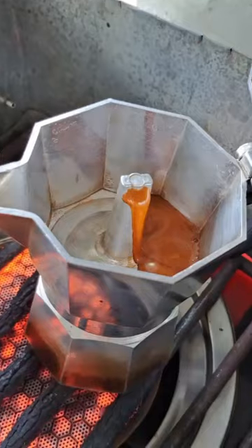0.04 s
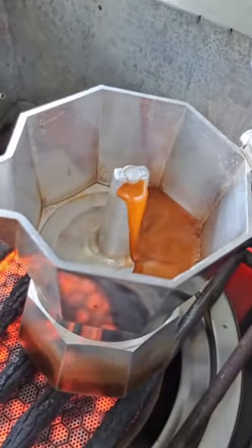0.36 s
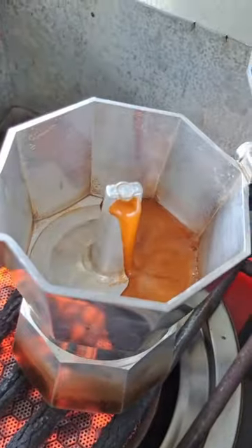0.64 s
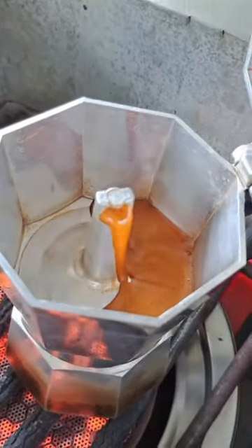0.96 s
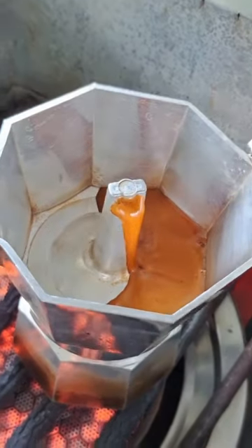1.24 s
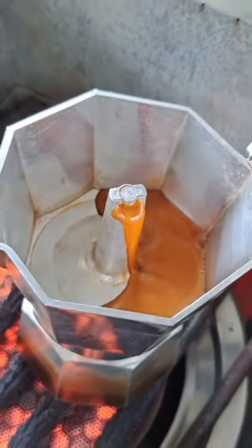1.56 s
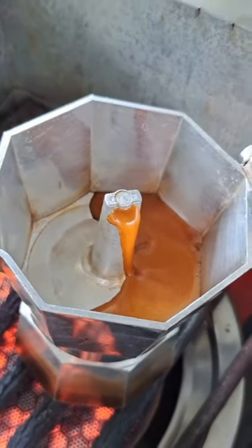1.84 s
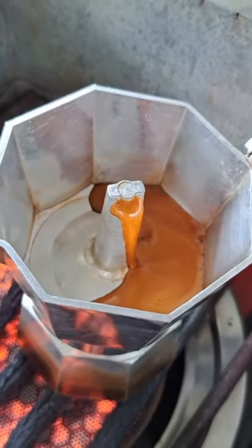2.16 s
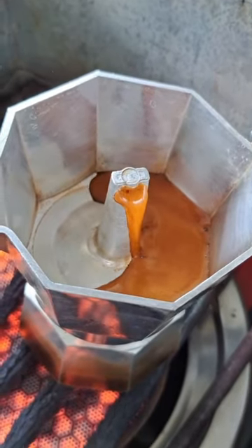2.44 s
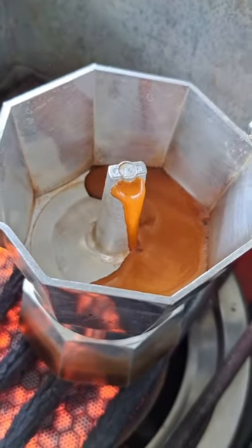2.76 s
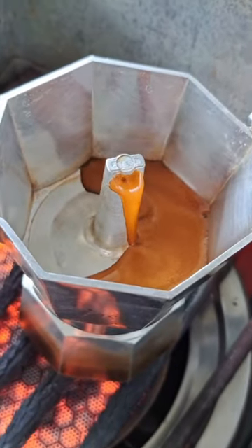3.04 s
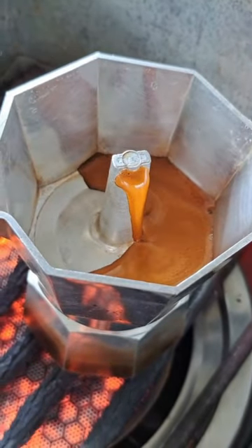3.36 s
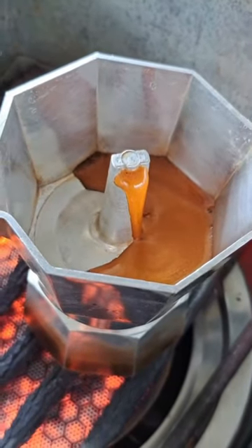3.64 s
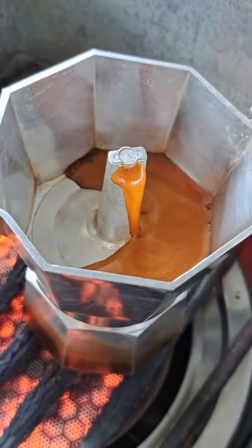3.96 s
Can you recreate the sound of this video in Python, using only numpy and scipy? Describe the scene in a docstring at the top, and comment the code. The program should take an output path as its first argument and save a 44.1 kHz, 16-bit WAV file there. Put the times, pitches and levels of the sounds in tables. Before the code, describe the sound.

A gas flame roars softly and steadily under a stovetop coffee pot for four seconds, heard close, with a deep rumble, a thin hiss and a faint whine. The hot metal ticks once at about 0.9 seconds. Two faint, high steam squeaks follow around 1.7 seconds. From about 2.3 seconds a fine sizzle of steam and tiny bubbles grows, spitting lightly as the coffee rises.

```python
"""A gas flame under a stovetop coffee pot, in stereo, the microphone close above the stove.
The flame roars softly in the hollows of stove and pot and whines faintly over a deep rumble.
Gas hisses from the jet, and a fine sizzle of steam and bubbles grows as the coffee wells up the spout.
The hot metal ticks once, and steam squeaks faintly twice through a wet gap."""
import sys
import numpy as np
from scipy import signal
from scipy.fft import rfft, irfft, next_fast_len
from scipy.io import wavfile
from scipy.ndimage import uniform_filter1d, map_coordinates

SR = 44100
rng = np.random.default_rng(int(sys.argv[2]) if len(sys.argv) > 2 else 0)


def wrap_up_sound(samples):
    """Save the sound to the file named by the first command line argument, as 16-bit audio."""
    columns = np.atleast_2d(samples).T
    # keep every value between -1 and 1, then stretch to whole-number steps
    tamed = np.clip(columns, -1, 1)
    steps = np.round(tamed * 32767).astype(np.int16)
    wavfile.write(sys.argv[1], SR, steps)


N = 176400

# Level of the roar's midrange: time_s, level_db
ROAR_MID_LEVEL = [(.1, -44), (.55, -44), (1.1, -42), (1.5, -41), (2.2, -41.5), (2.7, -42), (3.1, -41),
                  (3.5, -41.5), (4, -41)]
# Phase of the roar between the channels: freq_hz, left_lead_rad
ROAR_PHASE = [(100, -.2), (180, -.25), (300, .05), (400, -.2), (550, -.15), (700, -.45), (870, -.6),
              (990, .3), (1250, -.6), (1700, .2), (2300, 1.7), (2800, 2), (4000, 6.5)]


def flame(crossover_hz=380, top_hz=3900, flutter_db=0.6, flutter_per_s=45):
    """Fluttering combustion noise sounds the hollows of stove and pot; its bass is alike on both sides."""
    # Spectrum of the combustion noise: freq_hz, gain_db
    spectrum = [(60, -42), (90, -14), (120, -3), (200, -2.5), (290, -8), (450, -9), (520, -10),
                (750, -12.5), (1000, -14.5), (1200, -18), (1500, -19.5), (2000, -20.5), (2550, -23),
                (2850, -24), (3150, -24), (4200, -28.5)]
    # Resonances of the hollows: centre_hz, width_hz, left_lift_db, right_lift_db
    hollows = [(88, 20, -3, -3), (137, 14, 8, 7), (174, 14, 9, 9), (220, 14, 2, 3), (286, 36, 7.5, 7.5),
               (317, 14, -4, -4), (339, 22, 7, 6), (400, 35, 5, 4), (460, 24, 5, 5), (484, 18, -7, -5),
               (550, 40, 7, 3), (695, 32, 7, 6), (748, 22, 8, 9), (850, 40, 3, 5), (922, 20, 3, 8),
               (989, 26, 5, 8), (1113, 45, 5, 2), (1247, 36, 6, 7), (1500, 80, 6, -3), (1720, 110, 2, 8),
               (1930, 110, 0, 4), (2225, 70, 3, 6), (2320, 70, 5, 5), (2770, 140, 2, 3), (3320, 100, 3, 0),
               (3770, 120, 4, 4)]
    # Likeness of left and right: freq_hz, correlation
    likeness = [(100, 0.99), (400, 0.97), (700, 0.88), (1000, 0.52), (1500, 0.18), (2300, 0.4),
                (2800, 0.26), (3400, 0.45)]
    # Stereo balance: freq_hz, left_minus_right_db
    balance = [(100, -0.9), (600, 1.5), (900, 1.5), (1200, -6), (1500, -7), (2000, -10), (2550, -8.5),
               (2800, -4), (3200, -4), (4000, 2.5)]
    # Level of the roar's low end: time_s, level_db
    low_level = [(.1, -44), (.8, -41.5), (1.45, -39), (1.8, -41), (2.35, -40), (2.75, -41.5), (3.1, -40),
                 (4, -42)]

    def spread(hz):
        turn = np.arccos(np.clip(along(likeness, hz), -1, 1)) / 2
        return np.array([np.cos(turn), np.sin(turn)])

    def colour(hz):
        lift_db = sum(np.array([[left], [right]]) * resonance(hz, centre, width)
                      for centre, width, left, right in hollows)
        gain = amp(along(spectrum, hz) + lift_db + pan(along(balance, hz)))
        return gain * np.exp(1j * pan(along(ROAR_PHASE, hz))) / (1 + (hz / top_hz) ** 12)

    mid, side = filtered(rng.standard_normal((2, N)), spread)
    roar = filtered(np.array([mid + side, mid - side]), colour)
    bass = filtered(roar, lambda hz: 1 / (1 + (hz / crossover_hz) ** 4))
    low_end = unit(bass) * amp(curve(low_level)) * swells_and_dips()
    midrange = unit(roar - bass) * amp(curve(ROAR_MID_LEVEL))
    return (low_end + midrange) * amp(flutter_db * wobble(flutter_per_s))


def swells_and_dips(half_width_s=.024):
    """Chance swells and dips in the low roar's noise, placed at fixed times, as a gain."""
    # Brief changes of level: centre_s, change_db
    changes = [(.62, 3.5), (.85, -5), (.91, -1.5), (1.09, 3), (1.17, 2), (1.94, -7), (2.02, 3.5),
               (2.37, 0.5), (2.74, 5.5), (2.84, -3.5), (2.99, -2), (3.04, 0.5), (3.28, 2), (3.41, -8),
               (3.84, 2.5)]
    return amp(sum(db * bump(centre_s, half_width_s) for centre_s, db in changes))


def rumble(side_db=-19):
    """The flame's deepest rumble, nearly the same on both sides."""
    # Spectrum of the rumble: freq_hz, gain_db
    spectrum = [(18, -45), (30, -42), (42, -3.5), (53, -0.5), (61, -0.5), (71, -3), (84, -8), (120, -8.5),
                (300, -70)]
    # Its rise and fall: time_s, level_db
    level = [(.1, -50), (1.1, -53), (1.45, -44.5), (1.9, -49), (2.5, -45), (3.4, -46.5), (4, -45.5)]
    mid, side = filtered(rng.standard_normal((2, N)), lambda hz: amp(along(spectrum, hz)))
    return unit(mid + amp(side_db) * np.array([side, -side])) * amp(curve(level))


def whine(pitch_hz=991, waver_hz=7, against_midrange_db=-14, balance_db=-1, waver_db=1):
    """The burner's sharpest resonance sings as a faint, wavering tone that follows the flame."""
    phase = 2 * np.pi * np.cumsum(pitch_hz + waver_hz * wobble(50)) / SR
    level_db = curve(ROAR_MID_LEVEL) + against_midrange_db + pan(balance_db) + waver_db * wobble(22)
    return np.sqrt(2) * amp(level_db) * np.sin(phase + pan(along(ROAR_PHASE, pitch_hz)))


def jet(low_cut_hz=3700, waver_db=0.48):
    """Gas rushes from the nozzle; narrow, half-whistling resonances build over the first second or so."""
    # Spectrum of the rush: freq_hz, gain_db
    spectrum = [(4000, -1.5), (4700, 2.5), (5500, -0.5), (6500, 1), (7600, -3), (9000, -3), (11000, -4.5),
                (13000, -4.5), (14200, -6)]
    # Its stereo balance: freq_hz, left_minus_right_db
    balance = [(4000, -6.5), (5000, -8), (6500, -16.5), (7500, -6.5), (9000, -4.5), (11000, 0.5),
               (14000, -3)]
    # Level of the rush: time_s, level_db
    rush_level = [(.1, -55), (.8, -53.5), (1.5, -52), (4, -53)]
    # Resonances of the jet: centre_hz, width_hz, left_db, right_db
    peaks = [(6150, 110, -17, -4), (6645, 90, -8, 3.5), (6865, 80, -3, -2), (6970, 110, -10, -5.5),
             (7250, 300, -12, -18), (12350, 400, -12, -10)]
    # Their joint level: time_s, level_db
    whistle_level = [(.1, -63), (.45, -62.5), (.8, -59), (1.3, -56.5), (2.5, -57.5), (4, -59)]

    def rush_colour(hz):
        low_cut = 1 - 1 / (1 + (hz / low_cut_hz) ** 8)
        return amp(along(spectrum, hz) + pan(along(balance, hz))) * low_cut

    def whistle_colour(hz):
        return sum(amp([[left], [right]]) * resonance(hz, centre, width)
                   for centre, width, left, right in peaks)

    rush = unit(filtered(patchy_noise(depth_db=2.5), rush_colour)) * amp(curve(rush_level))
    whistle = unit(filtered(patchy_noise(depth_db=2.0), whistle_colour)) * amp(curve(whistle_level))
    return (rush + whistle) * amp(waver_db * wobble(30.1))


def sizzle(pops_per_s=680, pops_db=-7.5, bubbles_db=-8, sputter_db=1.5, sputter_per_s=55):
    """Steam, dry pops and bubbles at the spout swell with the coffee's flow and spit now and then."""
    # Spectrum of the froth: freq_hz, gain_db
    spectrum = [(1500, -22), (3000, -7), (3800, 2), (4300, -0.5), (5500, -2.5), (8000, 1), (10000, 4),
                (12000, 1.5), (13200, 0.5), (14200, -10)]
    # Its stereo balance: freq_hz, left_minus_right_db
    balance = [(5000, 1), (8500, -6), (10500, 0.5), (13000, 1.5)]
    # Sizzle of the rising coffee: time_s, level_db
    flow_level = [(.1, -59.5), (.9, -71), (1.15, -63), (1.42, -63), (1.85, -62.5), (2.35, -54), (2.62, -59),
                  (2.76, -55), (3.02, -58.5), (3.13, -51.5), (3.3, -54), (3.45, -53), (3.6, -52.5),
                  (3.82, -52.5), (4, -51)]
    # Spits of froth: centre_s, level_db, half_width_s
    spits = [(1.415, -50, .012), (2.065, -52, .007), (2.513, -50, .01), (2.75, -54, .01),
             (2.872, -53, .008), (3.44, -50.5, 0.021)]

    def colour(hz):
        return amp(along(spectrum, hz) + pan(along(balance, hz)))

    pops = unit(rng.standard_normal((2, N)) * (rng.random(N) < pops_per_s / SR))
    steam = unit(filtered(patchy_noise(depth_db=5.5) + amp(pops_db) * pops, colour))
    froth = unit(steam + amp(bubbles_db) * unit(filtered(bubbles(), colour)))
    flow = amp(curve(flow_level) + sputter_db * wobble(sputter_per_s))
    spitting = sum(amp(db) * bump(centre_s, half_width_s) for centre_s, db, half_width_s in spits)
    return froth * np.hypot(flow, spitting)


def bubbles(per_s=1300, middle_hz=10700, log_spread=.35, t60_s=.028, scatter_db=1.1):
    """Tiny froth bubbles each give a short, high ping on the left or on the right."""
    out = np.zeros((2, N + SR))
    t = np.arange(SR // 20) / SR
    for when, pitch, size, side in rng.random((int(per_s * N / SR), 4)):
        hz = middle_hz * np.exp(log_spread * (2 * pitch - 1))
        size_db = -scatter_db * np.log(max(size, 1 / 20))
        ping = amp(size_db - 60 * t / t60_s) * np.sin(2 * np.pi * hz * t)
        out[int(side < .5), int(when * N):][:len(t)] += ping
    return unit(out[:, :N])


def tick(start_s=.9425, level_db=-34, balance_db=-0.5,
         hold_s=0.00058, snap_t60_s=0.0047, ring_db=-16, ring_t60_s=0.11):
    """Hot metal gives one dry, bright snap with a short ring."""
    # Spectrum of the tick: freq_hz, gain_db
    spectrum = [(1200, -14), (2300, -7), (4000, -7), (5200, -12), (6800, -4), (8100, -12), (9500, 3),
                (11000, -7), (12700, -3), (14200, -7)]
    age = np.maximum(clock() - start_s, 0)
    snap = amp(-60 * np.maximum(age - hold_s, 0) / snap_t60_s)
    ring = amp(ring_db - 60 * age / ring_t60_s)
    noise = unit(filtered(rng.standard_normal((2, N)), lambda hz: amp(along(spectrum, hz))))
    return amp(level_db + pan(balance_db)) * (age > 0) * (snap + ring) * noise


def squeaks(pitch_hz=4980, rise_hz=650, rise_s=.010, waver_hz=50, tail_db=-5, tail_t60_s=.15):
    """Steam whistles through a wet gap, sliding up in pitch; the stove answers with a hissy tail."""
    # Escapes of steam: start_s, level_db, length_s
    escapes = [(1.661, -54.5, .022), (1.753, -53, .036)]
    direct = np.zeros(N)
    for start_s, db, length_s in escapes:
        age = np.clip(clock() - start_s, 0, length_s)
        hz = pitch_hz - rise_hz * np.exp(-(age / rise_s) ** 2) + waver_hz * wobble(710)
        direct += amp(db) * np.sin(np.pi * age / length_s) * np.sin(2 * np.pi * np.cumsum(hz) / SR)
    t = np.arange(SR // 5) / SR
    stove = rng.standard_normal((2, len(t))) * amp(-60 * t / tail_t60_s)
    tail = signal.fftconvolve(direct[None], stove / np.linalg.norm(stove[0]), axes=1)[:, :N]
    return direct + amp(tail_db) * tail


def patchy_noise(depth_db):
    """Stereo noise whose level varies in small patches of pitch and time."""
    spectra = signal.stft(rng.standard_normal((2, N)), nperseg=1024)[2]
    patches = uniform_filter1d(rng.standard_normal(spectra.shape[1:]), size=6, axis=0)
    patches = uniform_filter1d(patches, size=4, axis=1)
    return signal.istft(spectra * amp(depth_db * unit(patches)), nperseg=1024)[1][:, :N]


def amp(db):
    """Decibels to gain."""
    return 10 ** (np.asarray(db) / 20)


def unit(x):
    """Scale to rms 1."""
    return x / np.sqrt(np.mean(x ** 2) + 1e-20)


def clock():
    """Time of each sample in seconds."""
    return np.arange(N) / SR


def curve(points):
    """Join (time_s, value) points, one value per sample."""
    return np.interp(clock(), *np.transpose(points))


def along(points, hz):
    """Join (freq_hz, value) points on a log axis and read them at hz."""
    freqs, values = np.transpose(points)
    return np.interp(np.log(hz + 1), np.log(freqs + 1), values)


def bump(centre_s, half_width_s):
    """A bell curve in time, of height 1."""
    return np.exp(-((clock() - centre_s) / half_width_s) ** 2)


def resonance(hz, centre_hz, width_hz):
    """A resonant peak in frequency, of height 1."""
    return 1 / (1 + (2 * (hz - centre_hz) / width_hz) ** 2)


def wobble(knots_per_s):
    """A smooth random curve."""
    return map_coordinates(rng.standard_normal(4096), [clock() * knots_per_s], mode="wrap")


def pan(difference):
    """Split a left-minus-right difference of level or phase evenly between the channels."""
    return difference * np.array([[.5], [-.5]])


def filtered(x, response):
    """Pass x through a response given as a function of frequency."""
    size = next_fast_len(N + SR // 2)
    return irfft(rfft(x, size) * response(np.fft.rfftfreq(size, 1 / SR)), size)[..., :N]


def scene():
    """Burner and pot together, from close above."""
    return flame() + whine() + rumble() + jet() + sizzle() + tick() + squeaks()


def record(dry, start_s=.111, fade_s=0.0024, top_hz=14300):
    """The sound cuts in abruptly, with nothing above top_hz."""
    fade_in = np.clip((clock() - start_s) / fade_s, 0, 1)
    return filtered(dry * fade_in, lambda hz: hz < top_hz)


dry = scene()
out = record(dry)
wrap_up_sound(out)
```